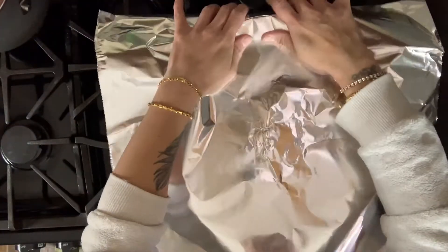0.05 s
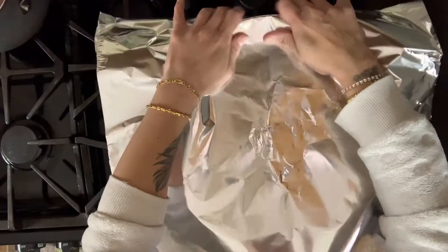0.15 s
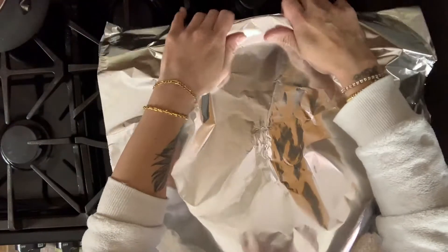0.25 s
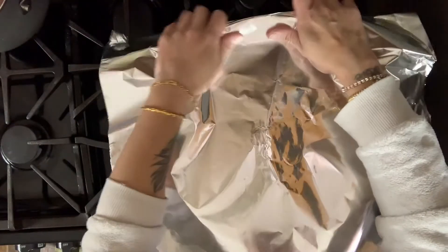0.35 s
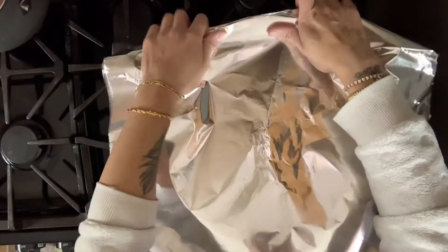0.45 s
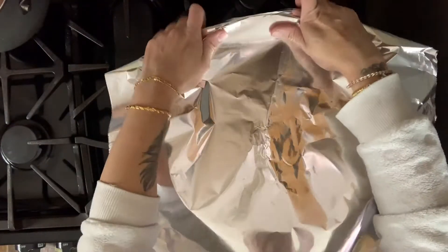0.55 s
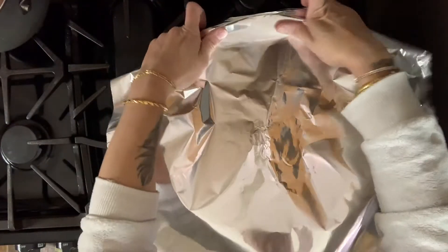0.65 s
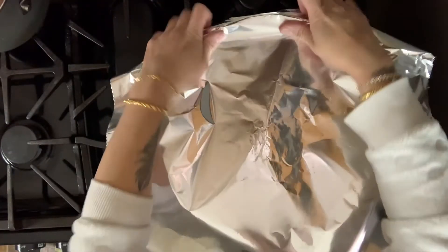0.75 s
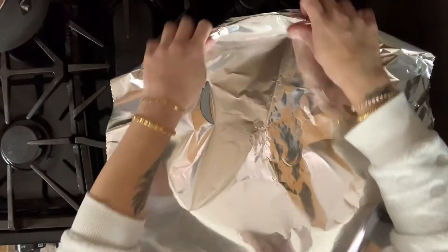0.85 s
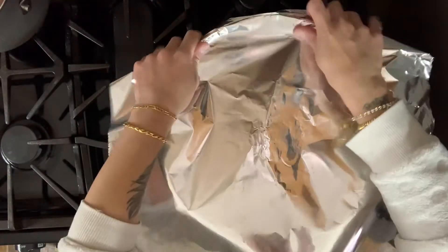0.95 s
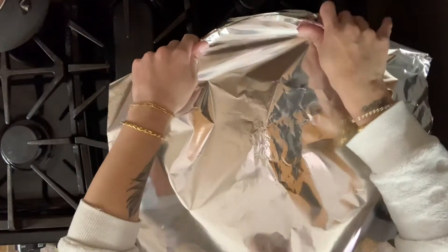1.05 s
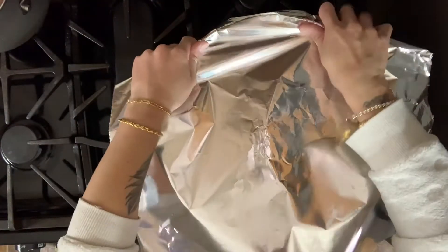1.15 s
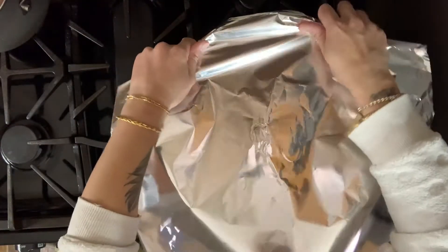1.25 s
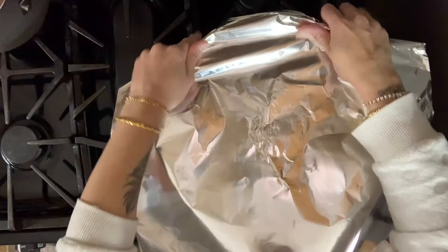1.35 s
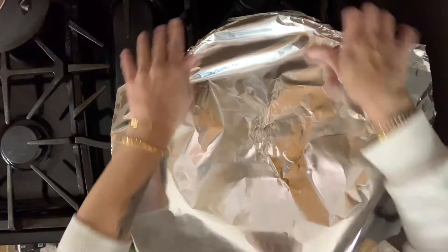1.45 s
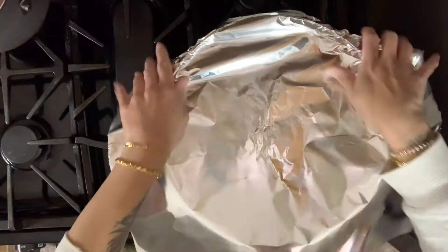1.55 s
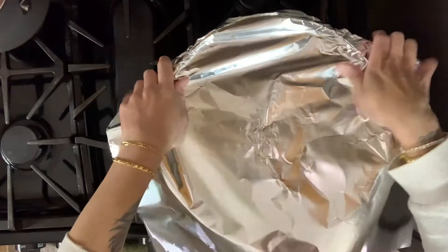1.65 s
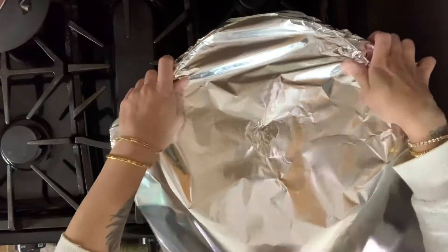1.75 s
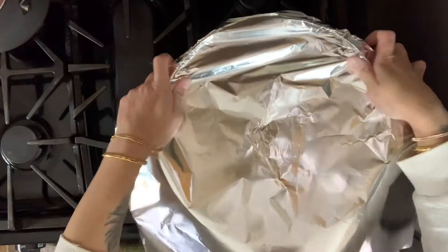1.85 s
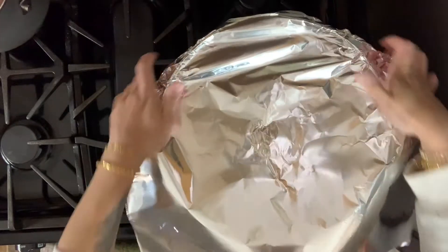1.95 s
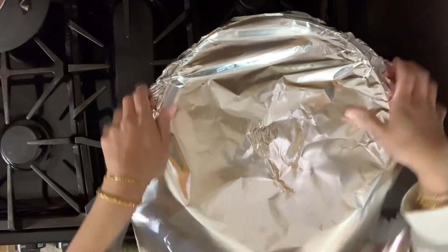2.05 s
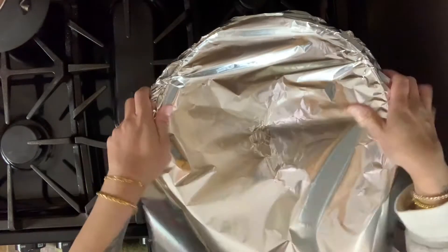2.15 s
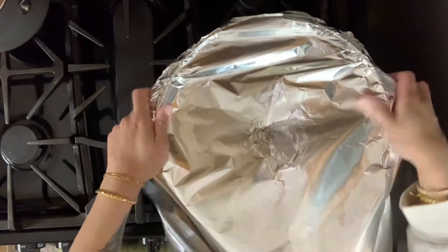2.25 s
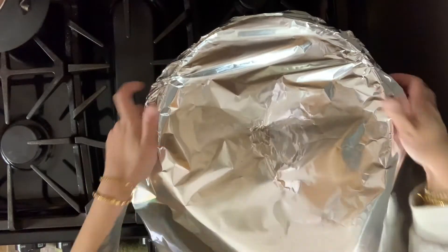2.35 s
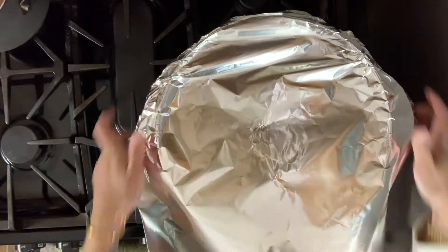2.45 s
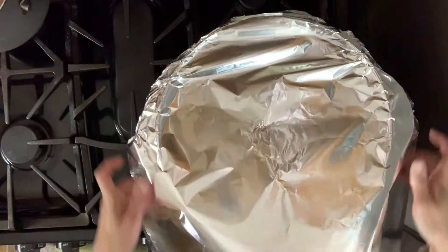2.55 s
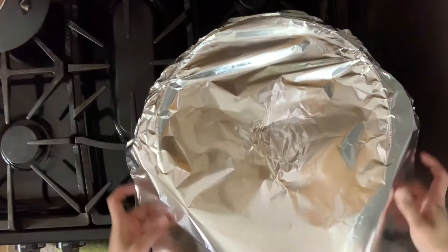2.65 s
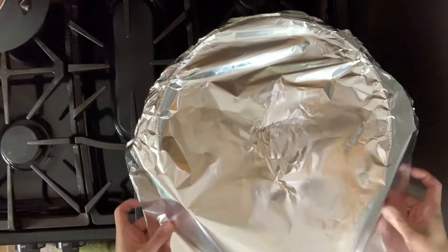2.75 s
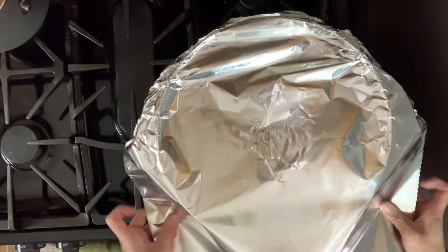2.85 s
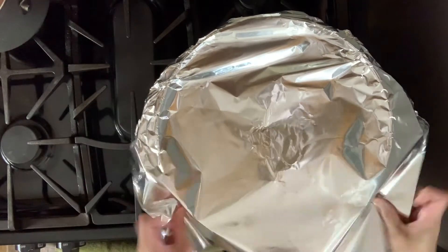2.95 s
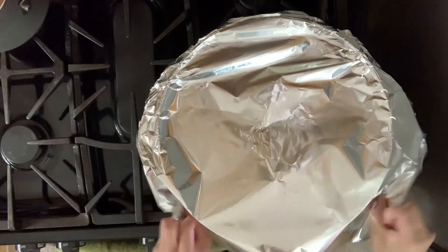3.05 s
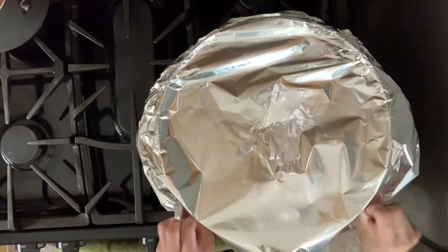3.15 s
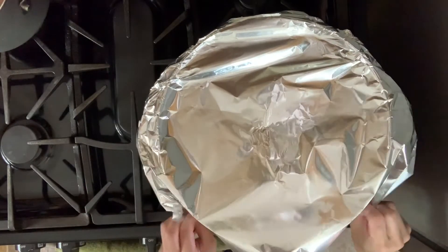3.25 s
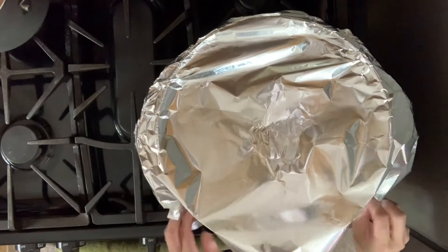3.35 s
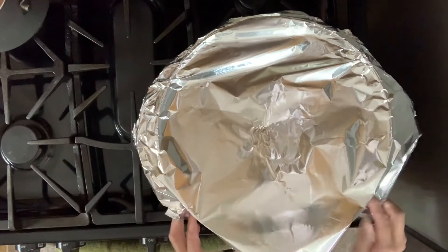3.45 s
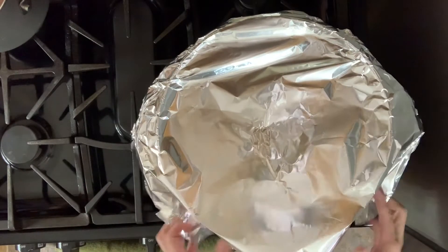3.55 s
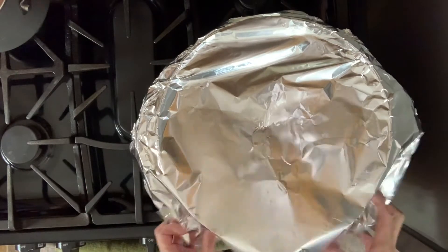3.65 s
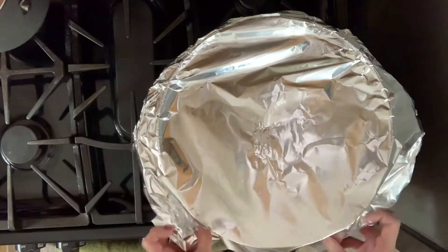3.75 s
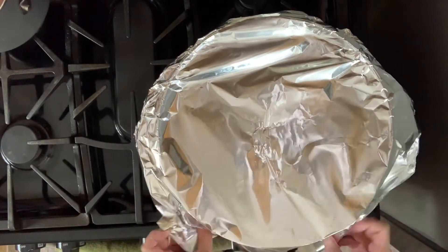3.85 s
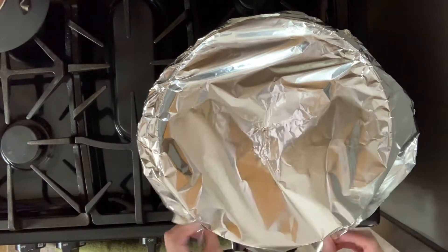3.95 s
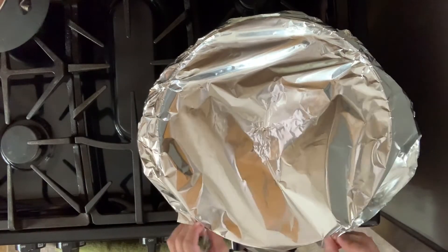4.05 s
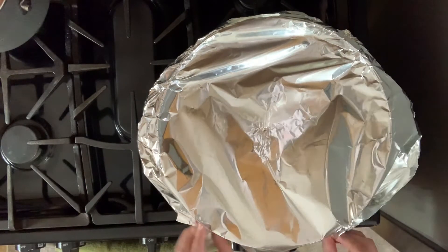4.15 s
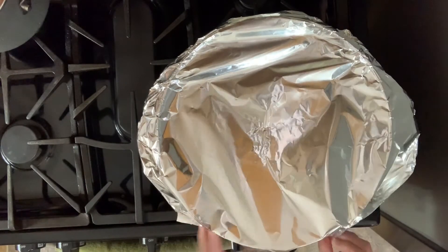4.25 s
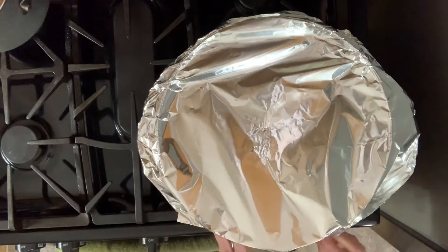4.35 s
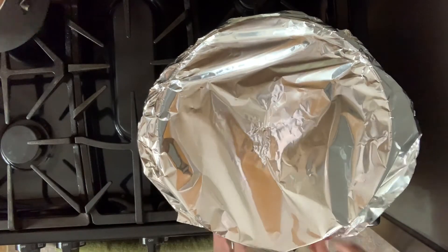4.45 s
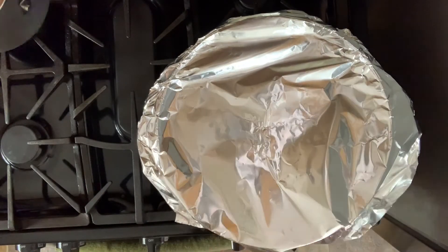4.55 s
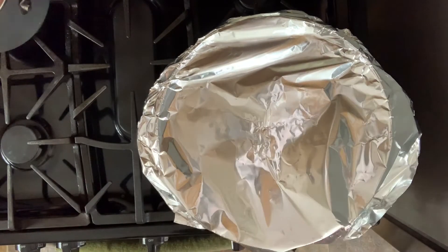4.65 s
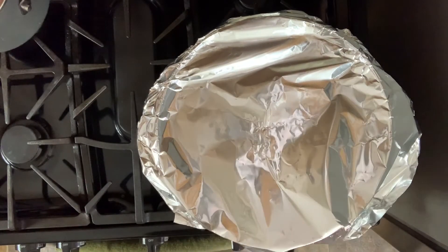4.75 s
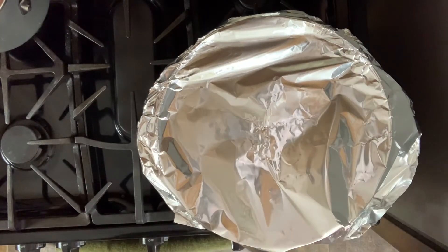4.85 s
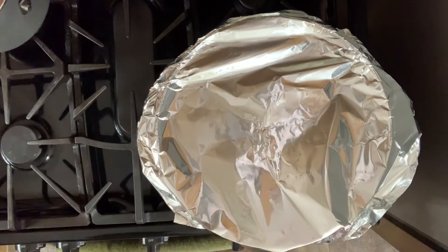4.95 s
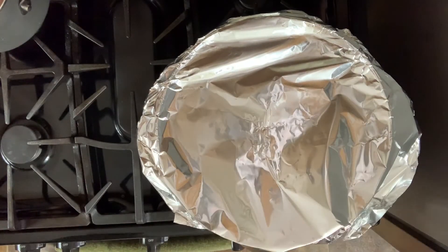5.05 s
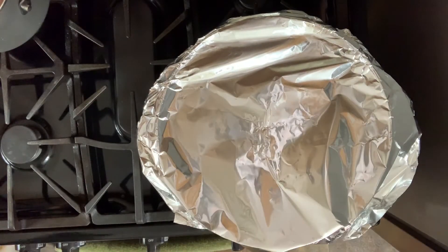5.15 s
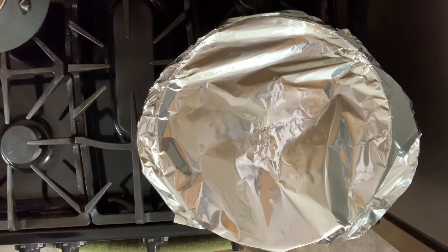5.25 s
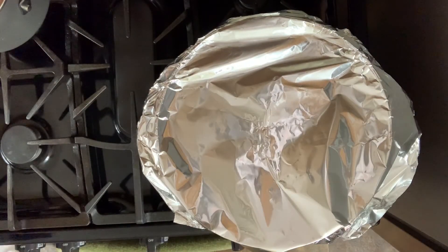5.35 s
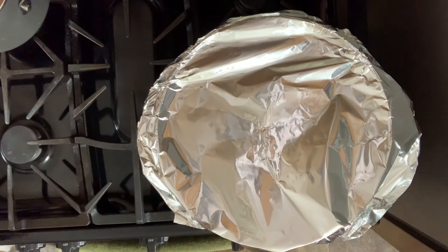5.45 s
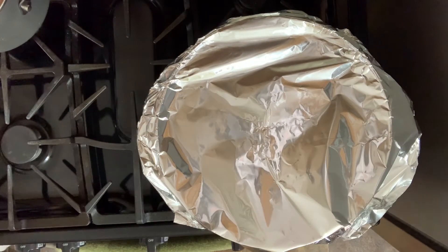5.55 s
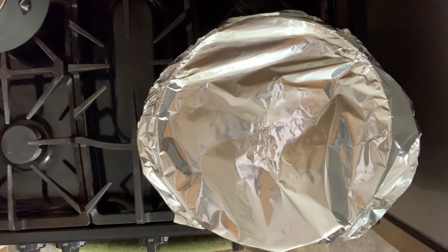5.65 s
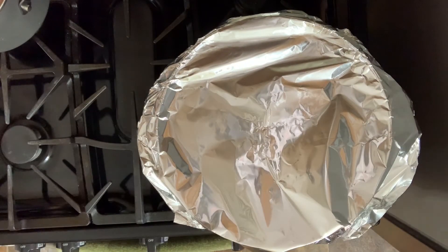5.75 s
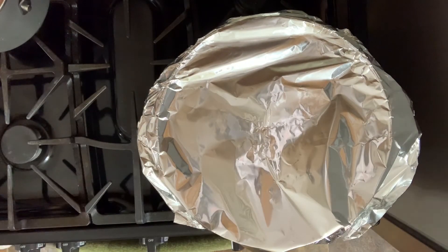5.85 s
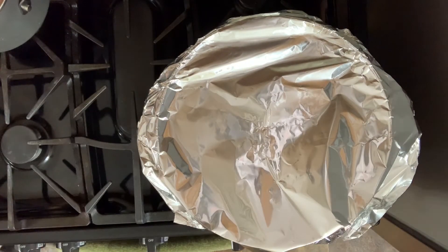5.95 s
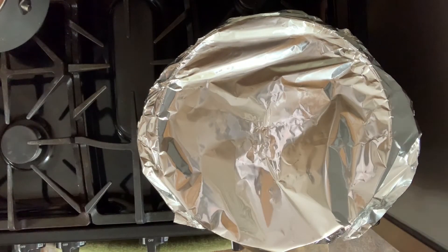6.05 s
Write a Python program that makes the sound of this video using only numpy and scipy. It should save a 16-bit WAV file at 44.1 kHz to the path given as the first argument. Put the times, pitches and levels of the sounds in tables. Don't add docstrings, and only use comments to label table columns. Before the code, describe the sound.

Hands crimp a sheet of aluminium foil over a pan, crinkling and crackling brightly in uneven bursts, with dull pan knocks, then quiet settling ticks.

```python
import sys
import numpy as np
from scipy import signal
from scipy.fft import rfft, irfft
from scipy.io import wavfile
from scipy.ndimage import uniform_filter1d

SR = 44100
rng = np.random.default_rng(int(sys.argv[2]) if len(sys.argv) > 2 else 0)


def int16_out(signal):
    q = np.round(np.clip(np.atleast_2d(signal).T, -1, 1) * 32767)
    wavfile.write(sys.argv[1], SR, q.astype(np.int16))


def decibels_to_gain(level_db):
    exponent = np.asarray(level_db, float) / 20
    return 10 ** exponent


N = 268569
HZ = np.fft.rfftfreq(N, 1 / SR)
TIME_S = np.arange(N) / SR

# freq_hz, density_db
RUMBLE_SPECTRUM = [(30, -9.5), (50, -5), (90, 2.5), (160, -8), (300, -7.5), (450, -12), (750, -25),
                   (1300, -33), (2200, -45), (3500, -34), (6000, -58), (8000, -70.5), (11000, -75.5),
                   (15000, -81.5)]
# freq_hz,
# likeness_0_1
NEAR_LIKENESS = [(60, .97), (250, .72), (500, .62), (1200, .45), (3300, .45), (5200, .38), (6100, .14),
                 (7500, .62), (8550, .89), (9050, .97), (9600, .97), (10300, .84), (12600, .76),
                 (13600, .97)]
# freq_hz, likeness_0_1
DIFFUSE_LIKENESS = [(60, .98), (160, .93), (300, .68), (700, .1), (8000, .1), (15000, .15)]
# freq_hz, #
PORT_LEAD = [(0, 0), (340, -.3), (600, -2.1), (1210, -5.9), (1890, -8.3), (2760, -8.1), (5250, -3.2),
             (5800, -3.2), (6300, -6.2), (7000, -4.7), (8800, -3.22), (9700, -3.05), (13500, 0), (14600, 0),
             (15300, .7)]
# freq_hz, left_minus_right_db
PORT_TILT = [(60, 3), (130, 2.5), (290, 4), (640, 1), (1410, -1.5), (3100, -0.5), (6820, 1), (15000, 0.5)]
# start_s, peak_db, pitch_hz,
# t60_s
KNOCKS = [(0.417, -51, 92, 0.15), (0.702, -19, 455, 0.063), (0.986, -21, 474, 0.083),
          (1.244, -35, 473, 0.15), (1.502, -30, 463, 0.14), (1.629, -25, 90.2, 0.19),
          (1.748, -28, 102, 0.3), (2.101, -30.5, 433, 0.66), (2.535, -49, 436, 0.17),
          (2.782, -13.5, 460, 0.049), (2.837, -27.5, 178, 0.51), (3.649, -42.5, 455, 0.13),
          (3.723, -26, 328, 0.28), (3.835, -25.5, 131, 0.24), (4.16, -33, 140, 0.3),
          (4.271, -26.5, 172, 0.45), (4.305, -20.5, 422, 0.11),
          (2.78, -35.5, 560, 0.082), (4.274, -19.5, 553, 0.13), (4.324, -25, 520, 0.12),
          (1.368, -39, 65, 0.27), (2.54, -40, 65, 0.39), (3.409, -26, 65, 0.22), (3.72, -28, 65, 0.25),
          (3.86, -29, 65, 0.27), (4.297, -25, 65, 0.34), (5.228, -31, 65, 0.36), (5.782, -29, 63.8, 0.38)]
# start_s, peak_db, pitch_hz, t60_s
PINGS = [(0.3496, -23, 1080, 0.055), (0.4698, -23, 1710, 0.13), (1.0435, -23, 2270, 0.093),
         (1.1443, -21, 2200, 0.14), (1.2511, -16.5, 2040, 0.067), (1.485, -23, 1100, 0.057),
         (1.5933, -15.5, 2000, 0.031), (1.7599, -18, 2060, 0.072), (2.0896, -36.5, 2200, 0.11),
         (2.1565, -25.5, 1350, 0.24), (3.0365, -17, 1870, 0.06), (3.6536, -25, 1140, 0.14),
         (3.7354, -25, 1890, 0.17), (3.7893, -23.5, 1460, 0.15), (4.3904, -20.5, 3670, 0.05),
         (4.8798, -47, 2770, 0.05), (5.0923, -44, 3230, 0.05), (5.7972, -45, 3480, 0.066)]
# start_s, peak_db, centre_hz, t60_s
CLICKS = [
    (1.485, -24.5, 1600, 0.035),
    (4.39, -41, 1600, 0.03),
    (5.12, -56, 1580, 0.03),
    (5.382, -51, 1600, 0.028),
    (5.655, -42.5, 1400, 0.02),
    (5.985, -46.5, 1610, 0.029),
]
# freq_hz, density_db
FOIL_COLOUR = [(300, -11), (500, -14), (750, -8.5), (1200, -10), (2000, -5.5), (3300, 1.25), (5000, 1.5),
               (7000, -2.5), (9000, 4), (12000, -0.5), (15500, -6)]
# freq_hz, width_hz, gain_db
SHEET_WAVES = [(740, 29, -6), (870, 130, 5.5), (1050, 83, 3.5), (1234, 110, 5), (1437, 43, 4.5),
               (1705, 100, 1.5), (2032, 85, 3), (2625, 620, -1), (3100, 300, 0), (4595, 200, 4.5),
               (6470, 540, 3)]
# freq_hz, width_hz, gain_db
PAN_AIR = [
    (455, 45, 16),
    (646.7, 32, 10.5),
]
# start_s, peak_db, t60_s
SNAPS = [(0.003, -11.5, 0.14), (0.3496, -17.5, 0.21), (0.382, -15, 0.14), (0.4174, -23, 0.2),
         (0.609, -38, 0.18), (0.868, -18, 0.23), (0.978, -25, 0.12), (1.0435, -12, 0.2),
         (1.1303, -14, 0.31), (1.2111, -25, 0.28), (1.4845, -32, 0.25), (2.087, -35, 0.29),
         (2.2742, -32, 0.25), (2.5262, -18, 0.25), (2.694, -8, 0.3), (2.7857, -3.5, 0.29),
         (2.9507, -15, 0.17), (3.0265, -10.5, 0.16), (3.0999, -11.5, 0.24), (3.236, -16.5, 0.33),
         (3.3493, -34, 0.18), (3.3912, -18.5, 0.36), (3.509, -10, 0.21), (3.6, -7.5, 0.21),
         (3.7359, -14.5, 0.2), (3.8751, -13.5, 0.44), (3.99, -11.5, 0.18), (4.1954, -26, 0.29),
         (4.389, -43, 0.16), (4.625, -38.5, 0.31)]
# start_s, peak_db, t60_s
TICKS = [
    (5.1782, -75, 0.35),
    (5.2586, -53, 0.94),
    (5.5609, -72, 0.35),
    (5.6606, -56, 0.24),
    (5.8602, -54.5, 0.4),
    (6.0597, -62, 0.35),
]
# start_s, peak_db
CRACKS = [(0.4183, -13), (0.609, -26), (0.6654, -23), (0.8704, -24), (0.9797, -23), (1.043, -11.5),
          (1.209, -22), (1.4845, -23.5), (1.506, -16), (1.9709, -30), (2.0885, -7.5), (2.2737, -18),
          (2.5246, -18), (2.5341, -14), (2.6953, -26.5), (2.792, -13), (3.0265, -45), (3.1004, -19),
          (3.236, -29), (3.4965, -30), (3.5114, -46), (3.6022, -28), (3.7354, -14), (3.8342, -27),
          (3.9874, -16), (4.227, -18), (4.3705, -23), (4.3912, -17), (4.4742, -22), (4.488, -17)]
# start_s, hold_s, effort_db, treble_crispness_db
SQUEEZES = [(0.067, 0.005, -30, -5), (0.212, 0.003, -30.5, 3), (0.408, 0.09, -33, -2.4),
            (0.668, 0.075, -28.5, -3.5), (0.878, 0.027, -30.9, -6), (0.988, 0.012, -31, -6),
            (1.042, 0.023, -30.5, -9.4), (1.143, 0.017, -29, -9), (1.215, 0.066, -26.5, -1.5),
            (1.36, 0.057, -30.5, -9.5), (1.525, 0.11, -23.5, -3), (1.687, 0.083, -25.5, -1),
            (1.839, 0.041, -29, -2.5), (1.984, 0.053, -27.5, -2.5), (2.1, 0.001, -20, 0),
            (2.166, 0.059, -26, -5), (2.282, 0.018, -29, 6), (2.343, 0.027, -28, -2),
            (2.56, 0.055, -26, -1.5), (2.683, 0.054, -30, 2), (2.77, 0.047, -32.5, -10),
            (3.021, 0.031, -26, -3), (3.205, 0.103, -44.5, 1), (3.377, 0.001, -34, -8.5),
            (3.651, 0.029, -24, 3.9), (3.815, 0.1, -32.5, -1), (3.992, 0.001, -29, -8),
            (4.21, 0.09, -35.5, -4.5), (4.377, 0.001, -41.5, 0), (4.5, 0.001, -30, 1.8)]
# start_s, pressure_db, loose_middle_flex_db
CONTACT = [(0.0, -25.5, -2.5), (0.19, -36.5, 2), (1.3, -32, -1), (1.47, -55, -3), (1.7, -36, -1),
           (2.1, -49, -2), (2.48, -35.2, -4.5), (2.82, -34, 0.5), (3.44, -40.5, 3.5), (3.56, -32.5, -1),
           (4.12, -43, 3.5), (4.45, -41, -0.5), (4.62, -50.5, 1), (4.83, -73, 3.5), (5.25, -63.5, -10),
           (5.262, -56, 0.5), (5.63, -71, -1), (6.09, -77, 7.5)]
USUAL_PRESSURE_DB = -40


def evened(x):
    return x / np.sqrt(np.mean(x ** 2) + 1e-20)


def read(points, hz):
    f, value = np.transpose(points)
    return np.interp(np.log(hz + 1), np.log(f + 1), value)


def above(hz, order=4):
    return 0.5 + 0.5 * np.tanh(order * np.log((HZ + 1) / hz))


def resonance(hz, width_hz):
    return 1 / (1 + (2 * (HZ - hz) / width_hz) ** 2)


def decay_db(age_s, t60_s):
    return -60 * age_s / max(t60_s, 0.02)


def ports(pair, near=True):
    f, lead_rad = np.transpose(PORT_LEAD)
    same = np.clip(read(NEAR_LIKENESS if near else DIFFUSE_LIKENESS, HZ), 0, 1)
    delay = np.exp(-1j * near * np.interp(HZ, f, lead_rad))
    right = same * pair[0] * delay + np.sqrt(1 - same ** 2) * pair[1]
    tilt_db = read(PORT_TILT, HZ) / 2
    return irfft(np.array([pair[0] * decibels_to_gain(tilt_db), right * decibels_to_gain(-tilt_db)]), N)


def rumble(level_db=-43, lumpy_db=1.5):
    noise = rfft(rng.standard_normal((2, N))) * decibels_to_gain(read(RUMBLE_SPECTRUM, HZ))
    lumps = uniform_filter1d(rng.standard_normal(N), size=4000)
    lumps = evened(uniform_filter1d(lumps, size=4000))
    return decibels_to_gain(level_db + lumpy_db * lumps) * evened(ports(noise, near=False))


def struck(rows, spread, rise_s, trim_db):
    out, t = np.zeros((2, N + 9000)), np.arange(9000) / SR
    for s, db, hz, t60_s in rows:
        b, a = signal.butter(1, [hz / spread, hz * spread], "bandpass", fs=SR)
        noise = rng.standard_normal((2, len(t)))
        rattle = evened(signal.lfilter(b, a, signal.lfilter(b, a, noise)))
        envelope = decibels_to_gain(db + trim_db + decay_db(t, t60_s)) * (1 - np.exp(-t / rise_s))
        out[:, round(s * SR):][:, :len(t)] += rattle * envelope
    return ports(rfft(out[:, :N]))


def knocks():
    pan = struck(KNOCKS, spread=1.45, rise_s=0.0024, trim_db=-8.5)
    pings = struck(PINGS, spread=1.08, rise_s=0.001, trim_db=-7)
    clicks = struck(CLICKS, spread=2.6, rise_s=0.0003, trim_db=-4)
    return pan + pings + clicks


def bursts(rows, rise_s):
    power, age_s = np.zeros(N + SR // 2), np.arange(SR // 2) / SR
    for s, db, t60_s in rows:
        envelope = decibels_to_gain(db + decay_db(age_s, t60_s)) * (1 - np.exp(-age_s / rise_s))
        power[round(s * SR):][:len(age_s)] += envelope ** 2
    return power[:N]


def hands(t, squeeze_db, steep, crisp, contact_db, slope):
    grip_db_per_s, relax_db_per_s = 275.5, 162.5
    pressure_db = np.interp(t, *np.transpose(CONTACT)[:2])
    power = decibels_to_gain(contact_db + slope * (pressure_db - USUAL_PRESSURE_DB)) ** 2
    for s, hold_s, effort_db, crisp_db in SQUEEZES:
        slack_db = grip_db_per_s * np.maximum(s - t, 0)
        slack_db = slack_db + relax_db_per_s * np.maximum(t - s - hold_s, 0)
        power = power + decibels_to_gain(effort_db + squeeze_db + crisp * crisp_db - steep * slack_db) ** 2
    return power


def creases(per_s=9000, spread_db=2.0, ring_s=0.01, tail_db=0., tail_s=0.13, width=0.26, count=20):
    size = decibels_to_gain(spread_db * np.minimum(rng.exponential(1, N), 5))
    size = size * (rng.random(N) < per_s / SR)
    facet, t, out = rng.integers(0, count, N), np.arange(3000) / SR, 0
    pop_hz = np.fft.rfftfreq(len(t), 1 / SR)
    for k, hz in enumerate(np.geomspace(400, 16000, count)):
        noise = rng.standard_normal((2, 2, len(t)))
        pop = evened(noise[0] * decibels_to_gain(-60 * t / ring_s))
        pop = pop + decibels_to_gain(tail_db) * evened(noise[1] * decibels_to_gain(-60 * t / tail_s))
        tone = 1 / np.sqrt(1 + ((pop_hz - hz) / (width * hz)) ** 4)
        ring = evened(irfft(rfft(pop) * tone))
        hits = (size * (facet == k))[None]
        out = out + signal.oaconvolve(hits, ring, axes=1)[:, :N]
    z = signal.stft(out, nperseg=512, noverlap=384)[2]
    patches = rng.standard_normal(z.shape[1:])
    patches = uniform_filter1d(patches, size=14, axis=0)
    patches = evened(uniform_filter1d(patches, size=9, axis=1))
    shifted = signal.istft(z * decibels_to_gain(1.6 * patches), nperseg=512, noverlap=384)[1]
    z = rfft(shifted[:, :N])
    return z / np.sqrt(uniform_filter1d(abs(z) ** 2, size=2500, axis=1))


def foil(hold_s=0.015, release_s=4.75, crack_t60_s=0.05):
    held_s = TIME_S.copy()
    for s in np.transpose(SNAPS + TICKS)[0]:
        held_s[max(round((s - hold_s) * SR), 0):round(s * SR)] = s - hold_s
    step_s = held_s[::32]
    flex = hands(step_s, squeeze_db=-7.5, steep=0.97, crisp=0, contact_db=-44.0, slope=0.66)
    effort = hands(step_s, squeeze_db=-0.5, steep=1, crisp=0, contact_db=USUAL_PRESSURE_DB, slope=1)
    fresh = hands(step_s, squeeze_db=0.93, steep=1.42, crisp=0.79, contact_db=-47.7, slope=1.58)
    flex, effort, fresh = (np.repeat(power, 32)[:N] for power in (flex, effort, fresh))
    flex = flex * decibels_to_gain(np.interp(TIME_S, *np.transpose(CONTACT)[::2])) ** 2

    waves_db = sum(db * resonance(hz, width_hz) for hz, width_hz, db in SHEET_WAVES)
    colour_db = read(FOIL_COLOUR, HZ)
    flat = creases() * decibels_to_gain(colour_db + waves_db)
    boom = np.array([1 + (decibels_to_gain(db) - 1) * resonance(hz, width_hz) for hz, width_hz, db in PAN_AIR])
    rim, whole = ports(flat), ports(flat, near=False)
    sheet = rfft(np.where(TIME_S < release_s, rim, whole)) * boom

    top, body = above(6700, order=8), above(2035)
    low = evened(irfft(sheet * np.sqrt(1 - body), N))
    middle = evened(irfft(sheet * np.sqrt(body - top), N))
    high = evened(irfft(rfft(rim) * np.sqrt(top), N))
    snap, tick = bursts(SNAPS, rise_s=0.003), bursts(TICKS, rise_s=0.00062)
    crack = bursts([(s, db, crack_t60_s) for s, db in CRACKS], rise_s=0.0003)
    out = low * np.sqrt(flex + decibels_to_gain(-31) ** 2 * snap + decibels_to_gain(-18) ** 2 * crack)
    out += middle * np.sqrt(effort + decibels_to_gain(-15.5) ** 2 * snap + decibels_to_gain(-12.5) ** 2 * crack)
    out += high * np.sqrt(fresh + decibels_to_gain(-13) ** 2 * snap + decibels_to_gain(-10) ** 2 * crack)
    bright = evened(irfft(rfft(whole) * np.sqrt(top) / decibels_to_gain(colour_db), N))
    return out + bright * decibels_to_gain(-8) * np.sqrt(tick)


def scene():
    return rumble() + knocks() + foil()


def low_pass(x):
    return signal.sosfilt(signal.butter(12, 16580, fs=SR, output="sos"), x)


def record(dry, ceiling=0.645, low_hz=34, edge_hz=15740):
    air = decibels_to_gain(-85.5) * ports(rfft(rng.standard_normal(dry.shape)))
    hiss = decibels_to_gain(-85) * rng.standard_normal(dry.shape)
    rounded = ceiling * np.tanh((dry + air + hiss) / ceiling)
    rounded = irfft(rfft(rounded) * above(low_hz, order=6), N)
    edge = signal.firwin(1023, edge_hz, window=("kaiser", 9), fs=SR)
    mix = signal.oaconvolve(rounded, edge[None], "same")
    return low_pass(mix)


dry = scene()
out = record(dry)
int16_out(out)
```